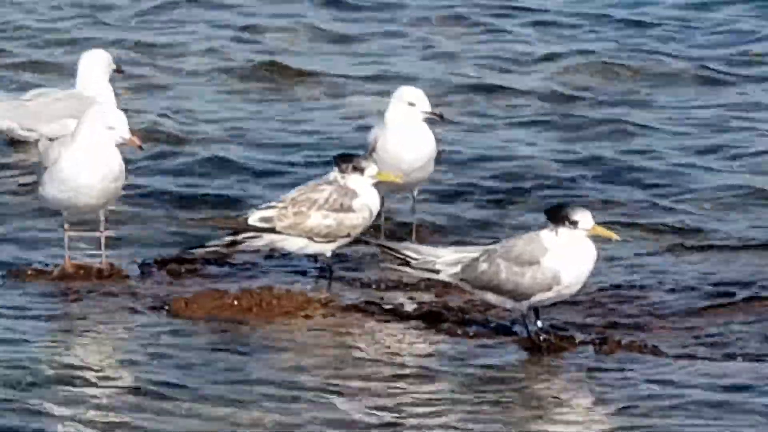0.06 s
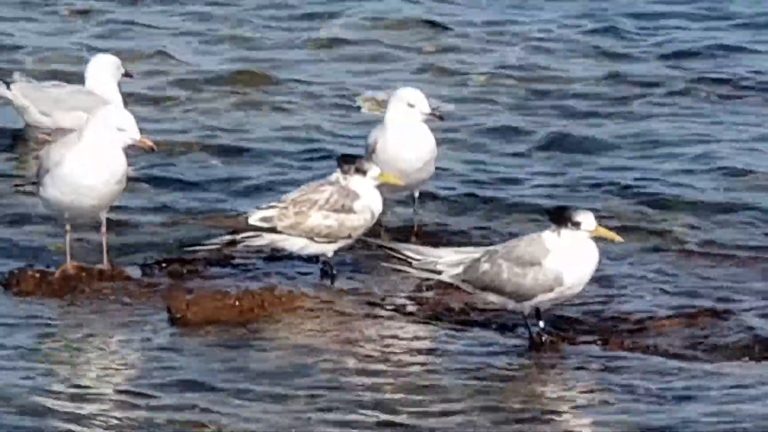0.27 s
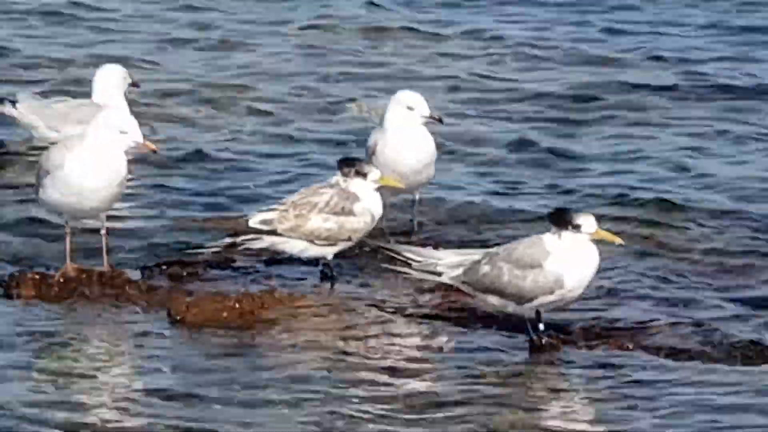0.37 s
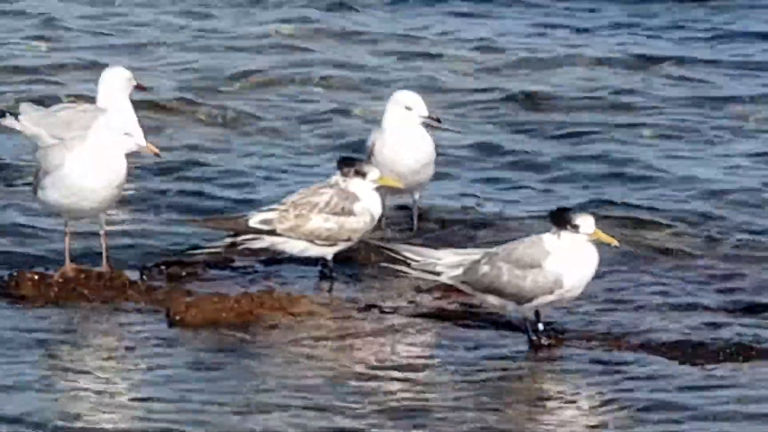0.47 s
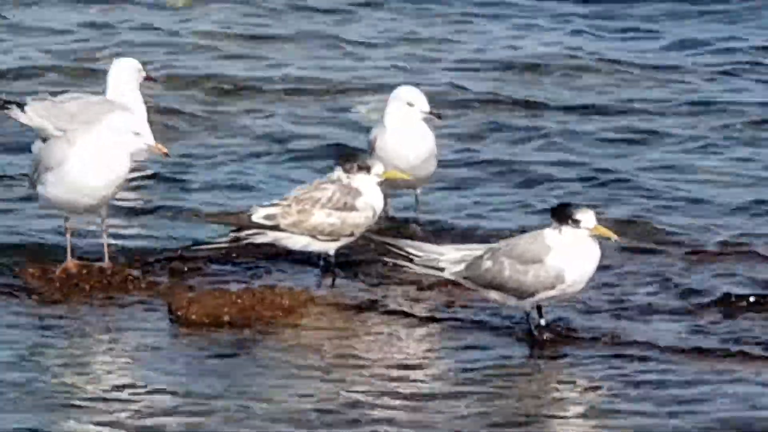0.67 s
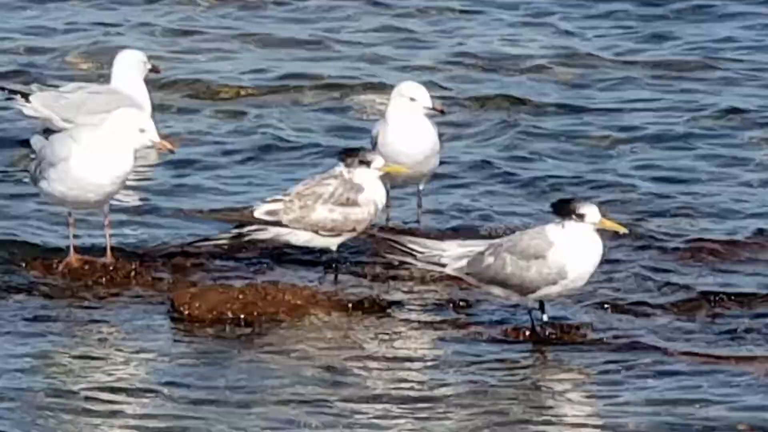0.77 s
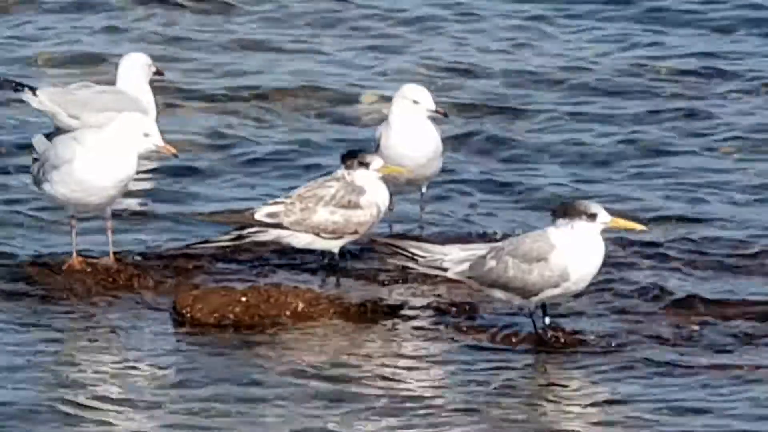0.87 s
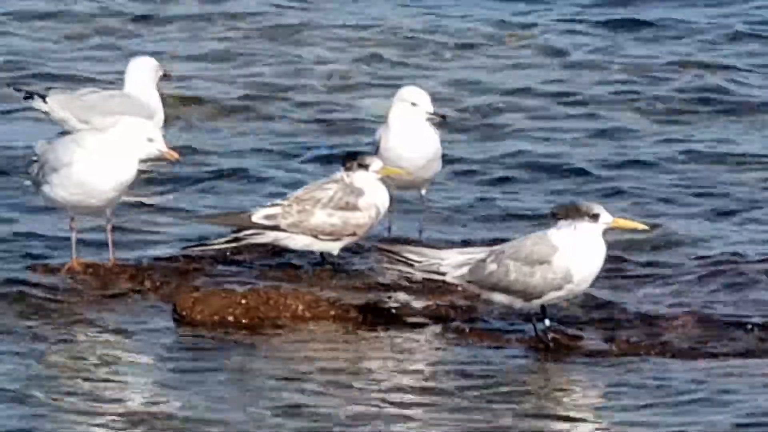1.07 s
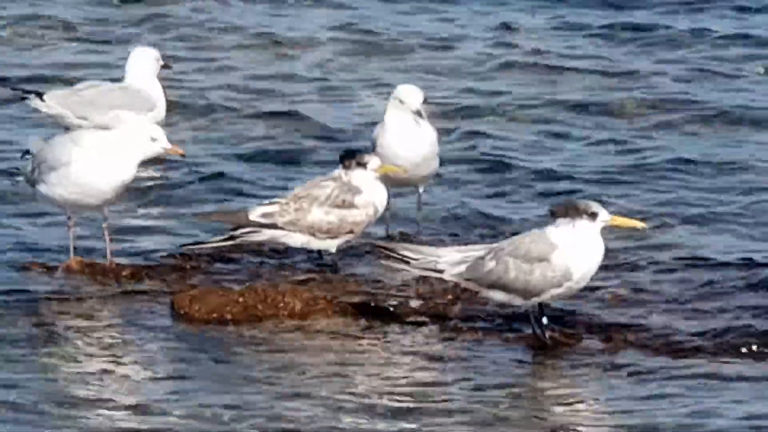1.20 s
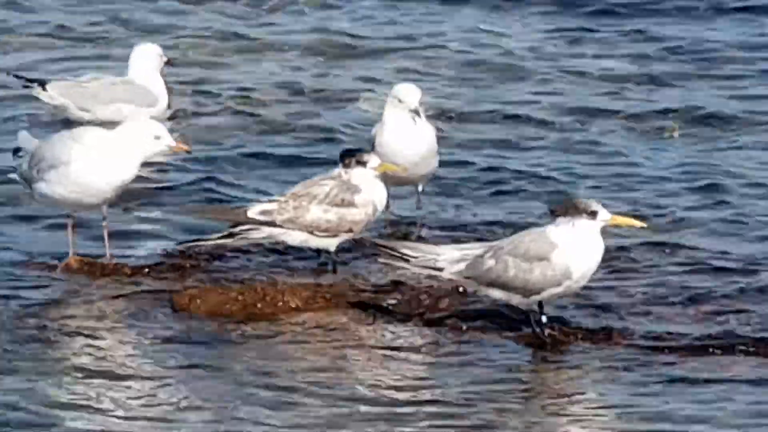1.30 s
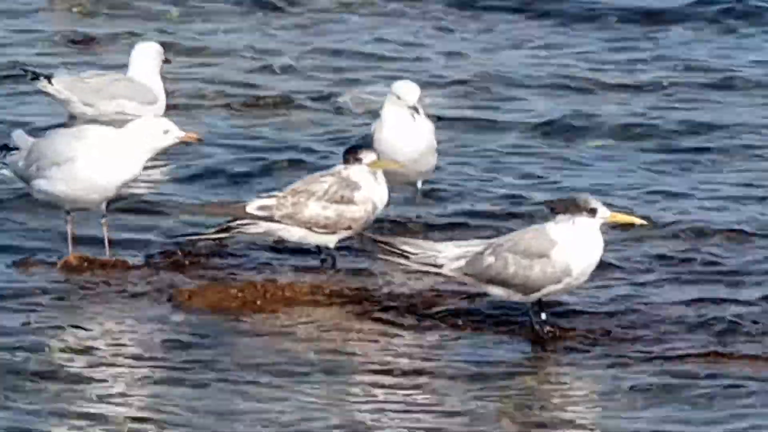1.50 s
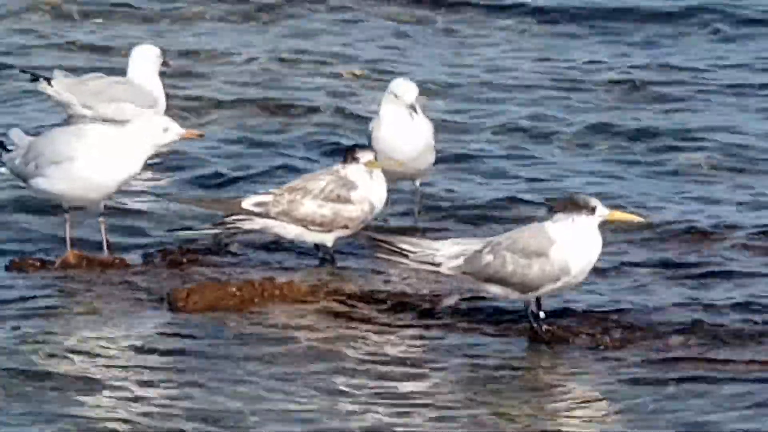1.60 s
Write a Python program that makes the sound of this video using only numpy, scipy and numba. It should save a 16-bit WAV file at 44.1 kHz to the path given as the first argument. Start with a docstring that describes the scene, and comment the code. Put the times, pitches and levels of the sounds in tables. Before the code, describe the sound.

One harsh tern call at a rocky shore: after a second of wavelets, spray ticks and wind rumble, a brief whistle breaks into a rapid grating rattle, then slows and fades; close outdoor stereo microphone.

```python
"""Rocky seashore: a tern gives one harsh call, and another bird calls faintly from further off.
The call is a thin arched whistle that breaks into a rattle of about eighty rasping chirps a second,
built from rising sines and a throat-filtered buzz; it slows and fades. The far bird is a run of falling notes.
Wavelets and spray are shaped noise, wind rumbles on the microphone as low noise, and a few tones hum far away."""
import sys
import numpy as np
from scipy import signal
from scipy.io import wavfile
from scipy.ndimage import uniform_filter1d
from numba import njit

SR = 44100
rng = np.random.default_rng(int(sys.argv[2]) if len(sys.argv) > 2 else 0)


def generate_wav(sig):
    """Save sig (samples, or channels by samples) to the path in sys.argv[1] as 16-bit PCM at SR."""
    pcm = np.round(np.clip(np.atleast_2d(sig).T, -1, 1) * 32767).astype(np.int16)
    wavfile.write(sys.argv[1], SR, pcm)


N = 72765
T = np.arange(N) / SR


def from_db(db):
    """Decibels to amplitude gain."""
    return 10 ** (np.asarray(db) / 20)


def rms_one(x):
    """Scale to unit rms."""
    return x / np.sqrt(np.mean(x ** 2) + 1e-20)


def in_time(rows):
    """Interpolate each column of a time curve at every sample."""
    time_s, *columns = np.transpose(rows)
    return [np.interp(T, time_s, column) for column in columns]


def at_hz(points, hz):
    """Read a spectrum on a log-frequency axis."""
    points_hz, values = np.transpose(points)
    return np.interp(np.log(hz), np.log(points_hz), values)


def drift(rate_hz):
    """Random wander of spread 1: white noise through a two-pole low-pass, computed at SR / 20."""
    step = 20
    r = np.exp(-2 * np.pi * rate_hz * step / SR)
    noise = rng.standard_normal(N // step + 2002)
    slow = signal.lfilter([1], [1, -2 * r, r * r], noise)[2000:]  # drop the settling
    return np.interp(np.arange(N) / step, np.arange(len(slow)), rms_one(slow))


def band(x, low_hz, high_hz, order=2):
    """Butterworth band-pass."""
    sos = signal.butter(order, [low_hz, high_hz], "band", fs=SR, output="sos")
    return signal.sosfilt(sos, x + 1e-18)


def pan(db):
    """Left and right gains for a left-minus-right level difference."""
    return from_db(np.array([[db], [-db]]) / 2)


def tone(hz, partials_db):
    """Harmonic tone on a pitch curve; a 0 dB partial has rms 1."""
    phase = 2 * np.pi * np.cumsum(hz) / SR
    partials = [from_db(db) * np.sin((k + 1) * phase) for k, db in enumerate(partials_db)]
    return np.sqrt(2) * sum(partials)


def during(rows):
    """1 while a time curve lasts, else 0."""
    return (T > rows[0][0]) & (T < rows[-1][0])


def swell(time_s, half_length_s):
    """Flat-topped note envelope."""
    return np.exp(-((T - time_s) / half_length_s) ** 4 / 2)


def banded_noise(spectrum, patchy_db, flicker_hz):
    """Third-octave bands of stereo noise, each flickering on its own; rms 1."""
    # (frequency [Hz], left-right correlation [-1 to 1])
    likeness = [(40, 0.03), (130, 0.14), (300, 0.38), (650, 0.93), (1500, 0.38), (4000, 0.09),
                (15000, -0.1)]
    # (frequency [Hz], left-right difference [dB])
    balance = [(40, -0.5), (150, 5), (350, 0), (900, 1), (3000, -2), (8000, 2), (15000, 38.5)]
    edges_hz = 20 * 2 ** (np.arange(30) / 3)
    white = rng.standard_normal((2, 2, N))
    out = 0
    for k, (low_hz, high_hz) in enumerate(zip(edges_hz, edges_hz[1:])):
        if high_hz < spectrum[0][0] or low_hz > spectrum[-1][0]:
            continue
        centre_hz = np.sqrt(low_hz * high_hz)
        mid, side = band(white[k % 2], low_hz, high_hz)  # neighbouring bands use separate noise
        alike = at_hz(likeness, centre_hz)
        stereo = np.sqrt(1 + alike) * mid + np.sqrt(1 - alike) * side * [[1], [-1]]
        level_db = at_hz(spectrum, centre_hz) + patchy_db * drift(flicker_hz)
        out = out + from_db(level_db) * pan(at_hz(balance, centre_hz)) * stereo
    return rms_one(out)


@njit
def resonate(x, hz, width):
    """Two-pole resonance with a moving centre, gain about 1 on top; frequencies in cycles per sample."""
    out = np.zeros(len(x))
    r = np.exp(-np.pi * width)
    for i in range(2, len(x)):
        drive = (1 - r * r) / 2 * (x[i] - x[i - 2])
        out[i] = drive + 2 * r * np.cos(2 * np.pi * hz[i]) * out[i - 1] - r * r * out[i - 2]
    return out


def hum():
    """Faint far-off drone: sines wavering in pitch and level."""
    # drone tones: (frequency [Hz], mean level [dB])
    hum_tones = [(290.5, -54), (583, -64), (722, -64)]
    out = 0
    for hz, db in hum_tones:
        pitch_hz = hz * (1 + .018 * drift(20))
        out = out + from_db(db + 3 * drift(12)) * tone(pitch_hz, [0])
    return out


def wind():
    """Wind rumbling on the microphone: low noise."""
    # wind spectrum: (frequency [Hz], relative density [dB])
    wind_spectrum = [(20, -16), (45, -9), (75, 1), (110, -3), (170, -9), (230, -12), (300, -21)]
    return from_db(-46) * banded_noise(wind_spectrum, patchy_db=-0.5, flicker_hz=45)


def puffs():
    """Brief low thumps of air: noise under Gaussian envelopes."""
    # puffs: (time [s], level [dB])
    puff_times = [(0.219, -39.5), (0.354, -38), (0.404, -40.5), (0.47, -37.5), (0.714, -38), (0.811, -34.5),
                  (1.034, -37), (1.183, -38), (1.415, -49)]
    # (low edge [Hz], high edge [Hz])
    puff_band_hz = [49.4, 151]
    half_length_s = 0.014
    envelope = sum(from_db(db) * np.exp(-((T - s) / half_length_s) ** 2) for s, db in puff_times)
    return pan(5.5) * envelope * rms_one(band(rng.standard_normal((2, N)), *puff_band_hz))


def sea():
    """Flickering bed of water noise at a constant mean level."""
    # sea spectrum: (frequency [Hz], relative density [dB])
    sea_spectrum = [(160, 2.5), (230, 2.5), (330, 5.5), (410, -11), (600, 3.5), (740, -5.5), (880, -12),
                    (1100, -0.5), (1500, -23), (2500, -23.5), (4000, -17.5), (6300, -24.5), (8000, -20),
                    (12000, -37.5), (16000, -40)]
    return from_db(-49.5) * banded_noise(sea_spectrum, patchy_db=2.5, flicker_hz=17.3)


def wash():
    """Water noise that swells and sinks."""
    # wash spectrum: (frequency [Hz], relative density [dB])
    wash_spectrum = [(400, 10), (700, 10), (1200, 0.5), (2000, 4), (3000, -5), (5000, -40), (12000, -25)]
    # swell of the water: (time [s], level [dB])
    wash_level = [(0, -54), (.29, -62), (.37, -51), (.54, -50), (.66, -52), (.76, -49), (.9, -51),
                  (1.3, -50), (1.5, -56), (1.65, -56)]
    level_db, = in_time(wash_level)
    return from_db(level_db) * banded_noise(wash_spectrum, patchy_db=3.0, flicker_hz=37)


def laps():
    """Wavelets slapping the rock: short Gaussian swells of band noise."""
    # wavelets: (time [s], level [dB], nominal frequency [Hz], half-length [s])
    wavelets = [(0.358, -50.5, 1550, 0.011), (0.747, -44, 740, 0.024), (0.751, -43.5, 1790, 0.0038),
                (0.817, -54, 1130, 0.024)]
    out = 0
    for s, db, hz, half_length_s in wavelets:
        gurgle = rms_one(band(rng.standard_normal(N), hz / 1.53, hz * 1.18))
        out = out + from_db(db) * np.exp(-((T - s) / half_length_s) ** 2) * gurgle
    return out


def drops():
    """Drops of spray tick on the rock: band noise with instant onset and exponential decay."""
    # drops: (time [s], level [dB], left-right difference [dB], centre [Hz])
    drop_times = [(.1116, -54, 5, 10500), (.2, -49, 7, 11000), (.4793, -46, -1, 5450), (.53, -48, 2, 9900),
                  (.5478, -45, -4, 7650), (.631, -46, 3, 6900), (.643, -46, -7, 5630),
                  (.7385, -49, 4, 8900), (1.4989, -46, 0, 9800), (1.5725, -46, -8, 8000),
                  (1.596, -48, 10, 8500), (1.6161, -34, -8, 6460), (1.6217, -41, 3, 9500)]
    decay_s, spread = 0.0022, 1.54  # spread: band edges as a factor around the centre
    out = 0
    for s, db, side_db, hz in drop_times:
        tick = rms_one(band(rng.standard_normal((2, N)), hz / spread, hz * spread))
        envelope = (T >= s) * np.exp(-np.abs(T - s) / decay_s)
        out = out + pan(side_db) * from_db(db) * envelope * tick
    return out


def spray():
    """Fine crackle: random clicks dealt among ten narrow bands."""
    clicks_per_s, level_db = 700, -66
    clicks = (rng.random((2, N)) < clicks_per_s / SR) * rng.standard_normal((2, N))
    pitches_hz = np.geomspace(3500, 13000, 10)
    dealt = rng.integers(0, len(pitches_hz), N)
    crackle = 0
    for k, hz in enumerate(pitches_hz):
        crackle = crackle + band(clicks * (dealt == k), hz / 1.05, hz * 1.05, order=1)
    return from_db(level_db) * rms_one(crackle)


def far_bird():
    """Distant bird: a falling run of raspy, pitch-jittered notes, each sliding down a little."""
    # notes: (time [s], half-length [s], mid pitch [Hz], level [dB])
    far_notes = [(.436, 0.003, 2970, -49), (.459, .008, 2980, -53), (0.483, .008, 2780, -52),
                 (0.505, 0.0094, 2645, -53), (0.529, 0.0068, 2460, -50), (0.549, 0.0041, 2300, -62),
                 (0.569, 0.0031, 1980, -65)]
    fall, jitter = .04, .1  # shares of the pitch
    out = 0
    for s, half_length_s, hz, db in far_notes:
        pitch_hz = hz * (1 - fall * np.tanh((T - s) / half_length_s) + jitter * drift(400))
        out = out + tone(pitch_hz, [0]) * swell(s, half_length_s) * from_db(db)
    return pan(-2.5) * out


def shore(call):
    """The call lags on the right; a bounce off the water and a short scatter of echoes follow."""
    # bounce delay per channel [s]
    bounce_lags_s = [.0027, .0034]
    right_lag_s, bounce_db = .00074, -15
    echo_db, echo_t60_s, echoes_per_s = -11.5, .07, 1500
    direct = np.array([call[0], np.interp(T - right_lag_s, T, call[1])])
    bounce = np.array([np.interp(T - lag_s, T, side) for lag_s, side in zip(bounce_lags_s, direct)])
    t = T[:SR // 2]
    hits = rng.random((2, len(t))) < echoes_per_s / SR
    echoes = rng.standard_normal((2, len(t))) * hits * from_db(-60 * t / echo_t60_s)
    echoes /= np.linalg.norm(echoes, axis=1, keepdims=True)
    scatter = signal.fftconvolve(call, echoes, axes=1)[:, :N]
    return direct + from_db(bounce_db) * bounce + from_db(echo_db) * scatter


def undertone():
    """Low harmonic voice that starts cleaner and grows hoarse through pitch jitter."""
    # lower voice: (time [s], pitch [Hz], nominal level [dB])
    low_voice = [(.98, 560, -70), (.995, 620, -53), (1.017, 700, -45), (1.048, 720, -46), (1.075, 740, -53),
                 (1.19, 660, -54), (1.25, 705, -66), (1.37, 730, -55), (1.44, 640, -59)]
    # partials, from the fundamental up: level [dB]
    low_partials_db = [-3, -3, -18, -18, 1]
    # (time [s], pitch jitter [share])
    hoarseness = [(1.02, .014), (1.1, .05), (1.33, .09)]
    hz, db = in_time(low_voice)
    jitter, = in_time(hoarseness)
    voice = tone(hz * (1 + jitter * drift(250)), low_partials_db)
    return voice * from_db(db + 2 * drift(80)) * during(low_voice)


def whistle():
    """One clear arched note, then short rough ones on about every second burst."""
    # notes: (time [s], half-length [s], top [Hz], level [dB], second partial [dB], pitch jitter [share])
    whistle_notes = [(.996, .0105, 1920, -39, -5, .012), (1.058, .0042, 1790, -29.5, -16, .035),
                     (1.08, .0055, 1780, -31, -16, .04), (1.104, .0055, 1780, -30.5, -16, .04),
                     (1.124, .006, 1880, -36, -14, .05), (1.146, .005, 1850, -37, -14, .06),
                     (1.17, .006, 1740, -35, -14, .05)]
    arch_depth, shimmer_db = .07, 3
    out = 0
    for s, half_length_s, hz, db, second_db, jitter in whistle_notes:
        arch = np.minimum(((T - s) / half_length_s) ** 2, 2)
        pitch_hz = hz * (1 - arch_depth * arch + jitter * drift(350))
        out = out + tone(pitch_hz, [0, second_db]) * swell(s, half_length_s) * from_db(db)
    return out * from_db(shimmer_db * drift(590))


def burst_clock():
    """Seconds from the crest of the nearest burst, by integrating the burst rate."""
    # rattle speed: (time [s], rate [bursts/s])
    burst_rate = [(1.03, 80.5), (1.1, 80.1), (1.135, 77.2), (1.17, 84.6), (1.23, 83), (1.27, 76.1),
                  (1.32, 70.6), (1.345, 64.9), (1.41, 67.1)]
    first_burst_s = 1.031
    rate, = in_time(burst_rate)
    turns = np.cumsum(rate) / SR
    turns -= np.interp(first_burst_s, T, turns)
    return (turns - np.round(turns)) / rate


def burst(from_crest_s, half_width_s):
    """Envelope of one burst: 1 at its crest, 1/2 at the half-width."""
    return 1 / (1 + np.abs(from_crest_s / half_width_s) ** 3)


def croak():
    """A few rough, low cycles lead each burst."""
    # croak: (time [s], level [dB], pitch [Hz])
    croak_curve = [(1.03, -40, 1540), (1.12, -31, 1780), (1.2, -40, 1820), (1.29, -39.5, 1780),
                   (1.35, -41, 1555), (1.41, -44, 1360), (1.45, -67, 1360)]
    lead_s, half_width_s, jitter_cycles = .003, .0014, .1
    db, hz = in_time(croak_curve)
    t = burst_clock() + lead_s
    cycles = hz * t + jitter_cycles * drift(440)
    voice = np.sqrt(2) * np.sin(2 * np.pi * cycles)
    return voice * burst(t, half_width_s) * from_db(db) * during(croak_curve)


def rattle():
    """Each burst is a few rising cycles of a pulsed buzz plus rasp noise, rung through throat resonances."""
    # rasp: (time [s], level [dB], burst half-width [s], roughness [0-1])
    rasp_curve = [(1.017, -39.5, 0.0056, 0.8), (1.032, -32, 0.0034, 0.9), (1.044, -28.5, 0.0039, 0.74),
                  (1.1, -32.5, 0.0065, 0.77), (1.135, -31.5, 0.0037, 0.64), (1.17, -29.5, 0.0025, 0.57),
                  (1.255, -31, 0.0038, 0.5), (1.285, -33, 0.0024, 0.7), (1.33, -37, 0.0051, 0),
                  (1.405, -42.5, 0.0029, 0.7), (1.46, -67, 0.0048, 0.9)]
    # buzz: (time [s], pitch at the crest [Hz], throat tuning [factor])
    buzz_curve = [(1.04, 1022, 0.98), (1.1, 1007, 1.013), (1.15, 1043, 1.005), (1.24, 1078, 1.0115),
                  (1.3, 989, 1.029), (1.38, 917, 1)]
    # throat and bill resonances: (centre [Hz], width [Hz], level [dB], left-right difference [dB])
    throat = [(3265, 265, 3.5, -8.5), (4030, 330, 1.5, 0.5), (4540, 420, 2, -7), (5360, 990, -7.5, 3.5),
              (5930, 800, -8.5, -0.5), (7620, 730, -11, -2), (8540, 2100, -10.5, 3),
              (9990, 1270, -10.5, -1), (10700, 970, -9.5, 2), (13700, 610, -38, 3)]
    # how strongly a resonance follows the tuning: (frequency [Hz], exponent)
    tuning_reach = [(4500, 1.4), (6500, 7.4)]
    # (low edge [Hz], high edge [Hz])
    rasp_band_hz = [2320, 13900]
    rise_per_s, jitter_cycles, wander = 26, .03, .045
    notch_hz, notch_width_hz, notch_depth = 6860, 1400, 0.62  # antiresonance of the throat

    level_db, half_width_s, rough = in_time(rasp_curve)
    pitch_hz, tuning = in_time(buzz_curve)
    t = burst_clock()

    def ring(x, hz, width_hz):
        """Resonance moved by the throat tuning."""
        return resonate(x, hz * tuning ** at_hz(tuning_reach, hz) / SR, width_hz / SR)

    cycles = pitch_hz * (1 + wander * drift(29.3)) * (t + rise_per_s * t ** 2 / 2)
    cycles = cycles + jitter_cycles * drift(460)
    buzz = rms_one(sum(np.cos(2 * np.pi * k * cycles) for k in range(2, 16)))
    mix = np.sqrt(1 - rough) * buzz + np.sqrt(rough) * rng.standard_normal(N)
    source = band(mix, *rasp_band_hz, order=3) * burst(t, half_width_s)
    source = source - notch_depth * ring(source, notch_hz, notch_width_hz)
    voice = 0
    for k, (hz, width_hz, db, side_db) in enumerate(throat):
        voice = voice + (-1) ** k * from_db(db) * pan(side_db) * ring(source, hz, width_hz)
    # level out the running power over about one burst, then apply the level curve
    window = SR // 80
    power = uniform_filter1d(np.mean(voice ** 2, axis=0), size=window)
    steady = np.sqrt(uniform_filter1d(power, size=window))
    return voice / steady * from_db(level_db) * during(rasp_curve)


def strokes():
    """Core of each burst: a brief, shrill upward chirp that starts afresh every time."""
    # chirps: (time [s], nominal level [dB], pitch at the crest [Hz], half-width [s])
    stroke_curve = [(1.018, -48, 4150, .002), (1.044, -25, 4130, .0015), (1.118, -25, 4060, .0015),
                    (1.146, -26.5, 4150, .0016), (1.17, -19.5, 4290, .0019), (1.205, -19.5, 4330, .0018),
                    (1.266, -21.5, 4350, .0019), (1.28, -28, 4270, .0018), (1.32, -28.5, 4330, .0024),
                    (1.39, -45, 4400, .0026), (1.44, -62, 4400, .003)]
    # partials, from the fundamental up: level [dB]
    stroke_partials_db = [-4, -22.5, -26]
    rise_hz_per_s, bend_s = 170000, .004  # slope at the crest; it flattens beyond the bend
    wander, jitter_cycles = .012, .035
    db, hz, half_width_s = in_time(stroke_curve)
    t = burst_clock()
    rise_cycles = rise_hz_per_s * bend_s ** 2 * np.log(np.cosh(t / bend_s))
    cycles = hz * (1 + wander * drift(60)) * t + rise_cycles + jitter_cycles * drift(500)
    chirp = 0
    for k, partial_db in enumerate(stroke_partials_db):
        chirp = chirp + from_db(partial_db) * np.sin(2 * np.pi * (k + 1) * cycles)
    envelope = burst(t, half_width_s) * from_db(db + drift(76)) * during(stroke_curve)
    return pan(-2.5) * np.sqrt(2) * chirp * envelope


def tern():
    """The tern's voices together, heard across the shore."""
    throaty = pan(-1.5) * (undertone() + whistle() + croak())
    return shore(throaty + rattle() + strokes())


def scene():
    """The birds over water, wind and hum."""
    air = hum() + wind() + puffs()
    water = sea() + wash() + laps() + drops() + spray()
    return air + water + far_bird() + tern()


def record(dry):
    """Steep elliptic low-pass cuts the top."""
    cutoff_hz = 15900
    return signal.sosfilt(signal.ellip(10, .1, 90, cutoff_hz, fs=SR, output="sos"), dry)


dry = scene()
out = record(dry)
generate_wav(out)
```